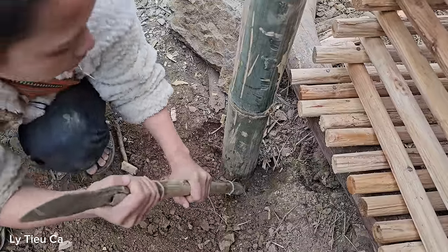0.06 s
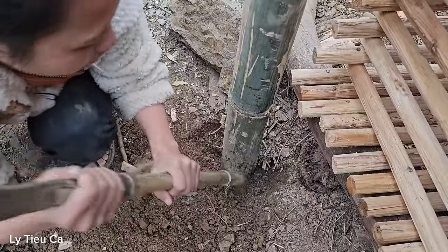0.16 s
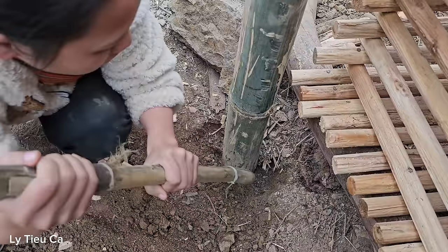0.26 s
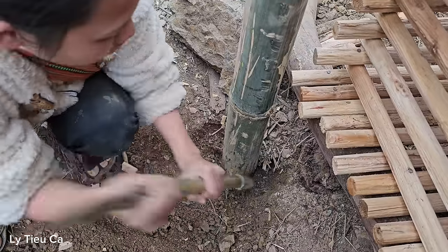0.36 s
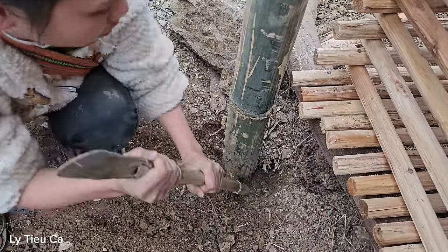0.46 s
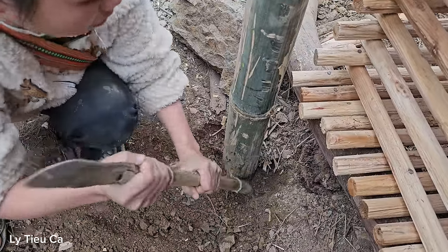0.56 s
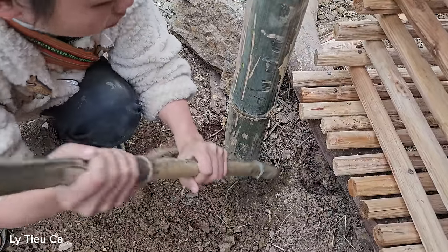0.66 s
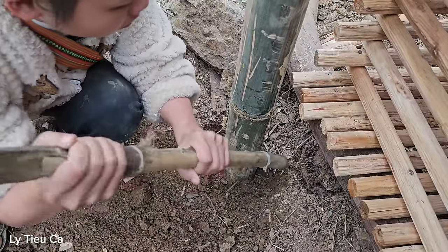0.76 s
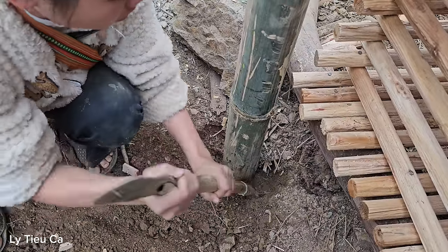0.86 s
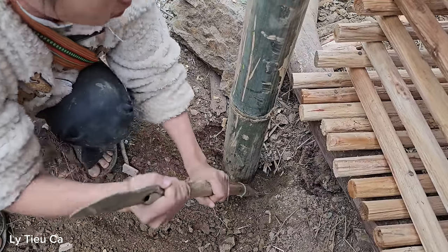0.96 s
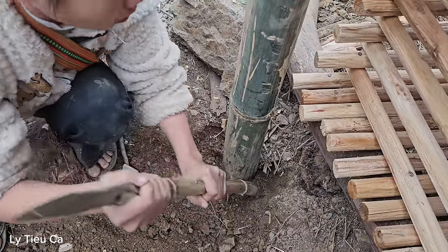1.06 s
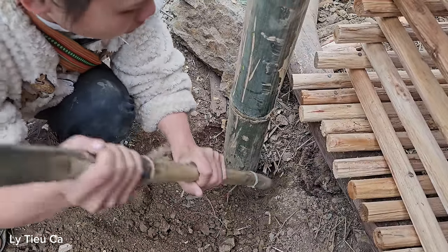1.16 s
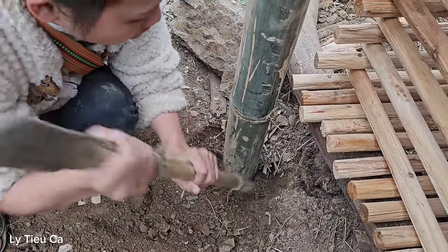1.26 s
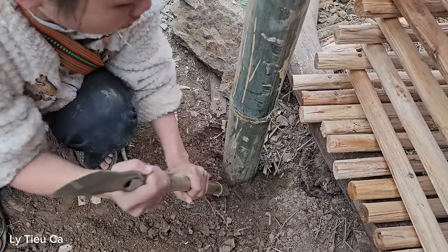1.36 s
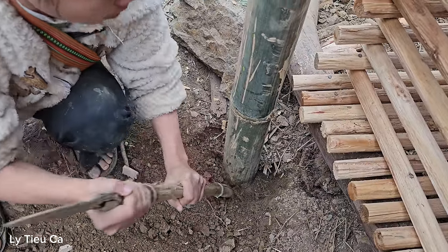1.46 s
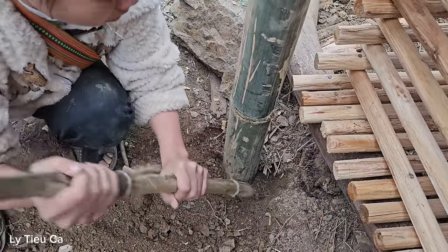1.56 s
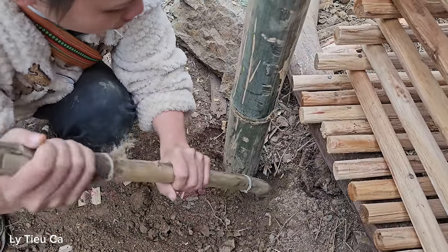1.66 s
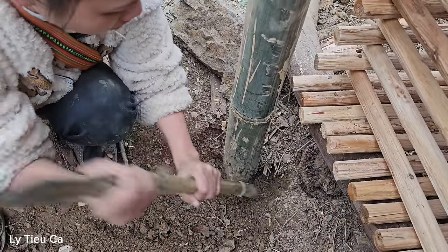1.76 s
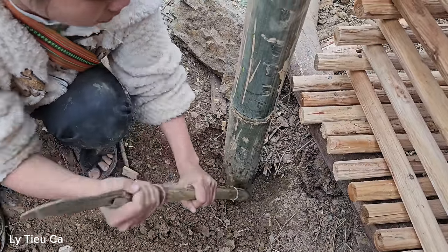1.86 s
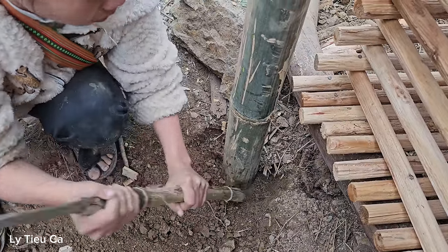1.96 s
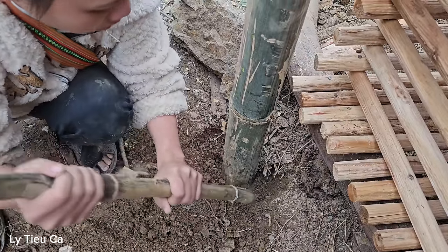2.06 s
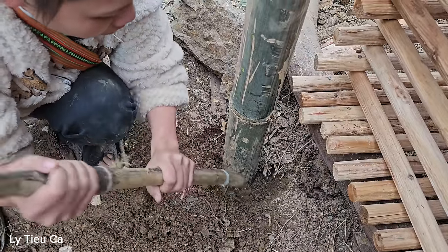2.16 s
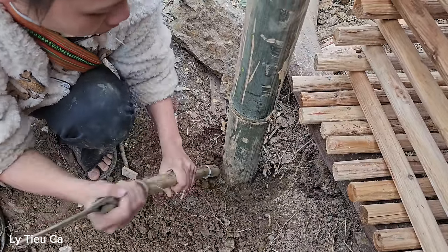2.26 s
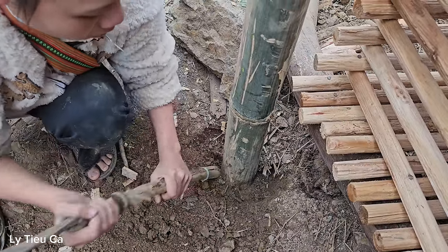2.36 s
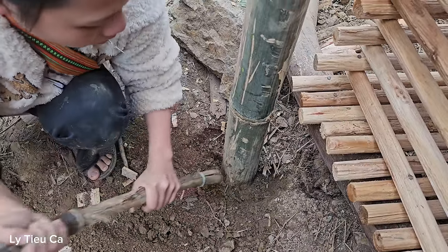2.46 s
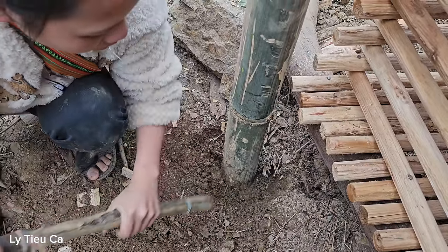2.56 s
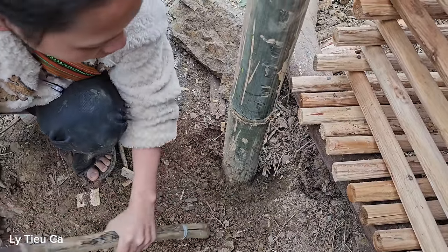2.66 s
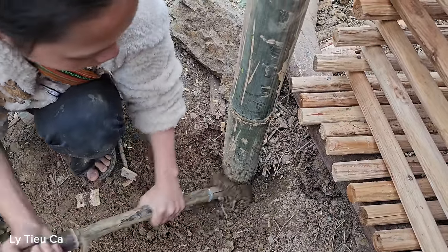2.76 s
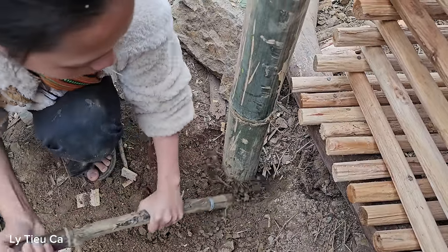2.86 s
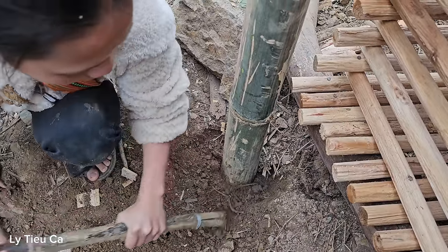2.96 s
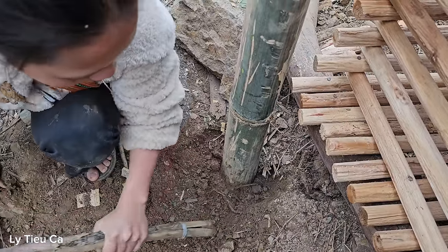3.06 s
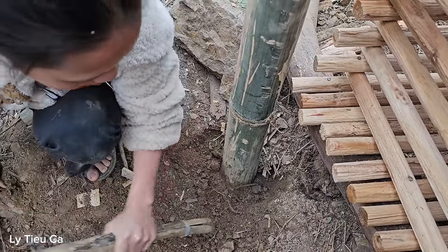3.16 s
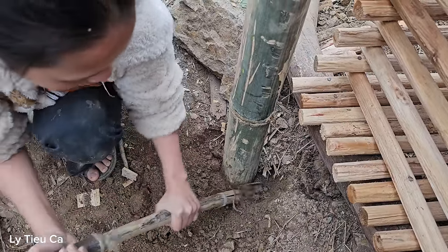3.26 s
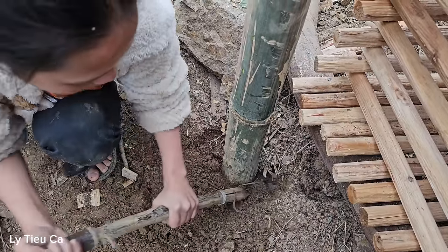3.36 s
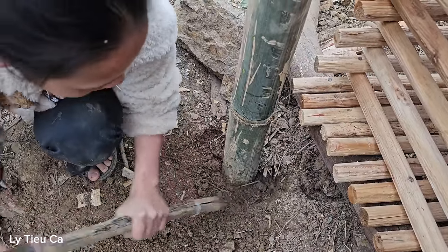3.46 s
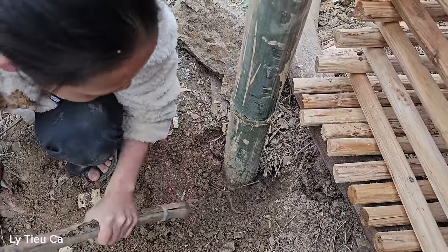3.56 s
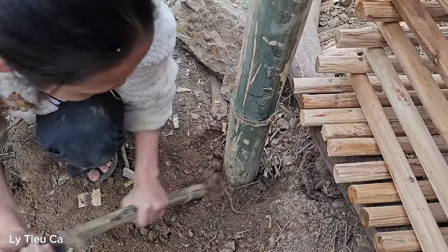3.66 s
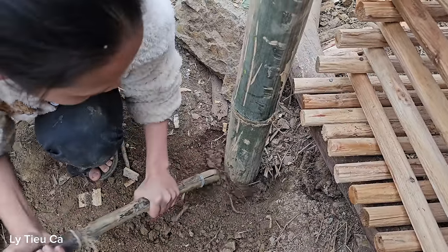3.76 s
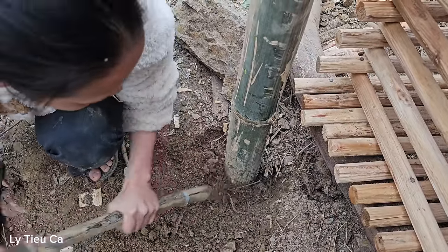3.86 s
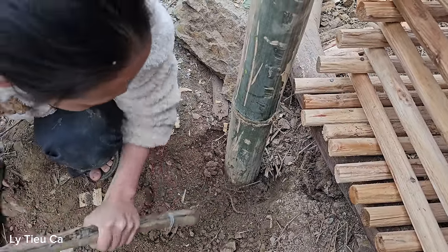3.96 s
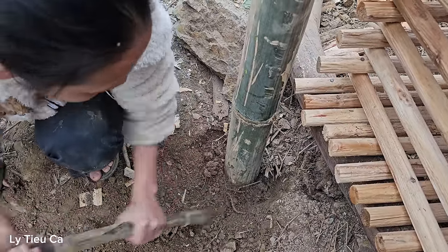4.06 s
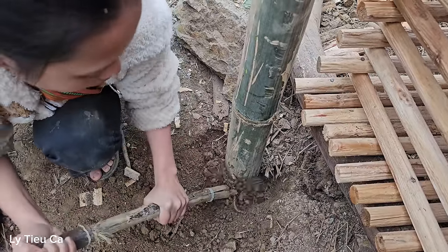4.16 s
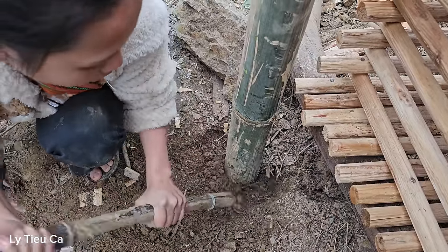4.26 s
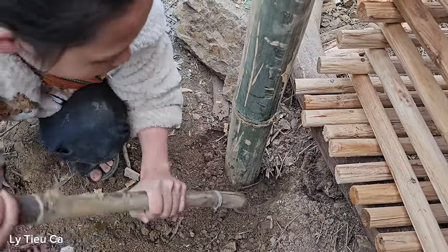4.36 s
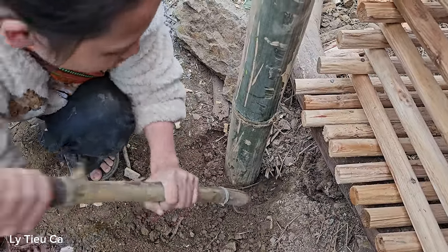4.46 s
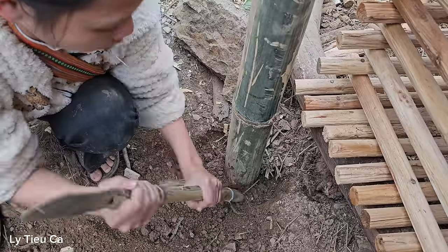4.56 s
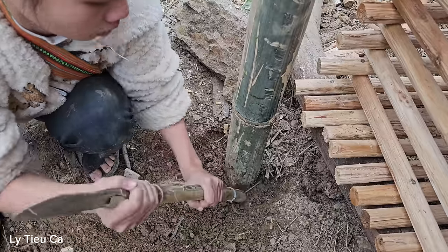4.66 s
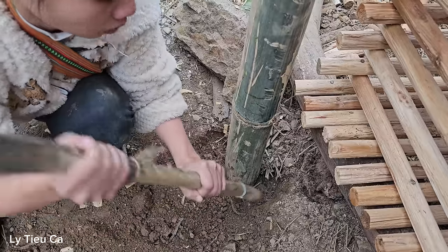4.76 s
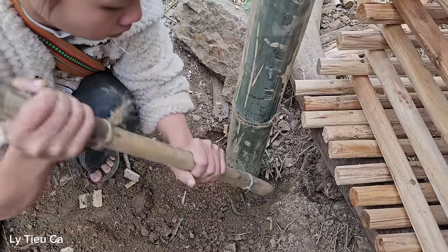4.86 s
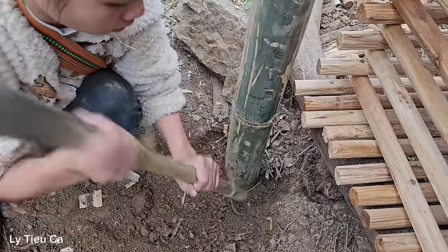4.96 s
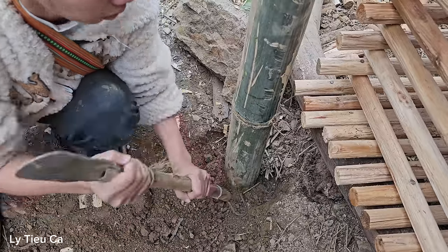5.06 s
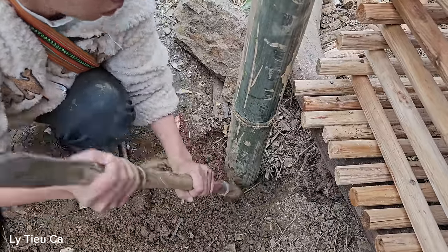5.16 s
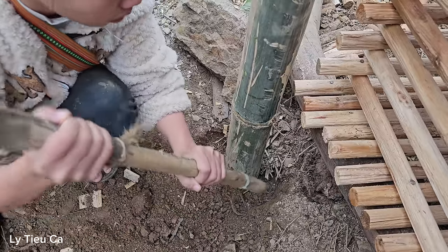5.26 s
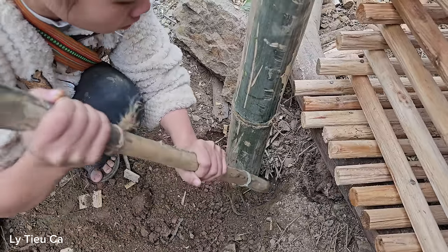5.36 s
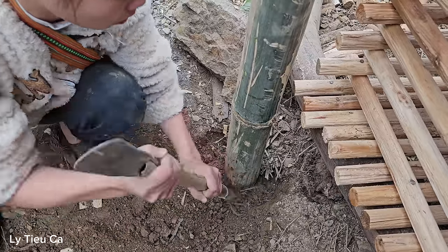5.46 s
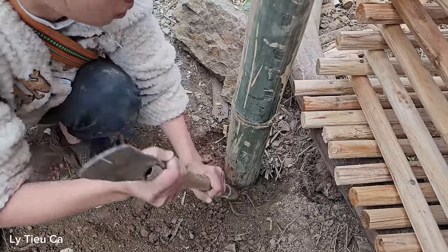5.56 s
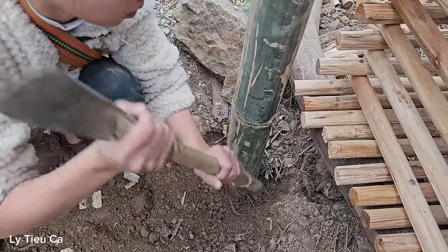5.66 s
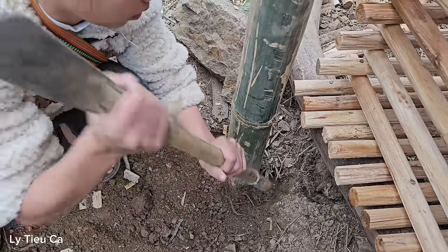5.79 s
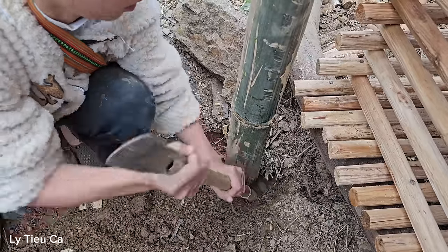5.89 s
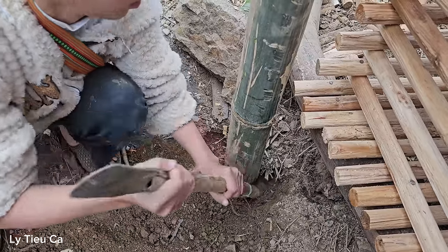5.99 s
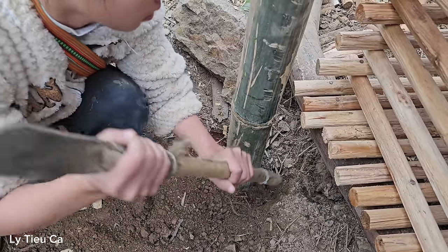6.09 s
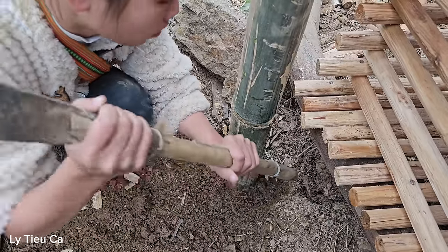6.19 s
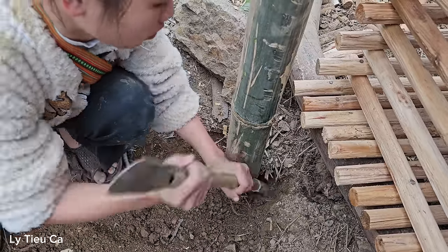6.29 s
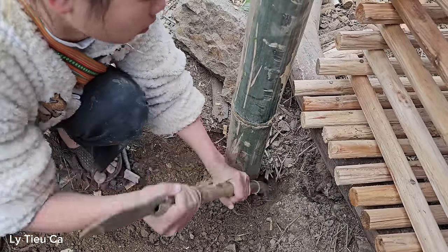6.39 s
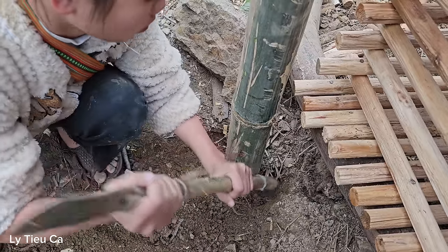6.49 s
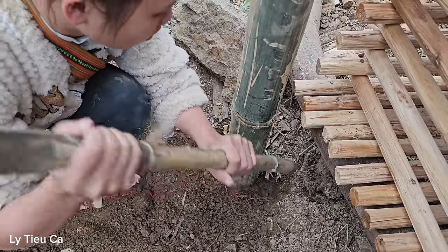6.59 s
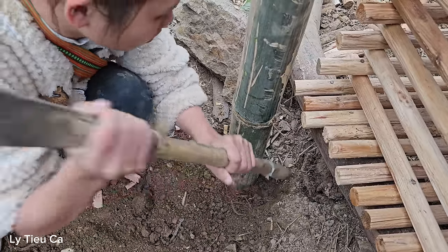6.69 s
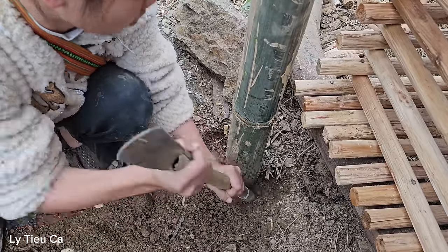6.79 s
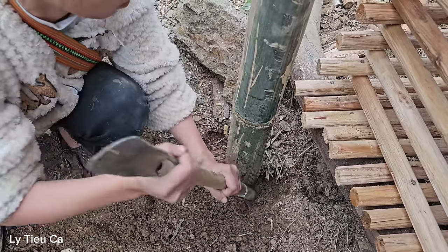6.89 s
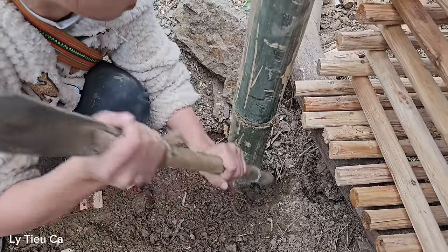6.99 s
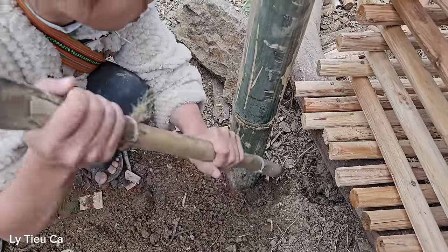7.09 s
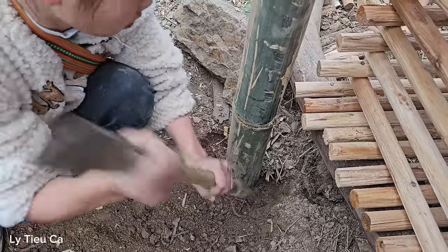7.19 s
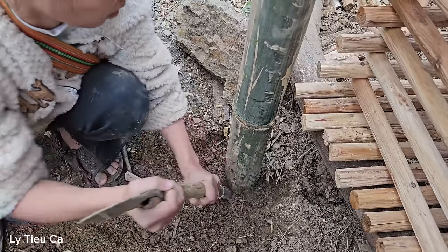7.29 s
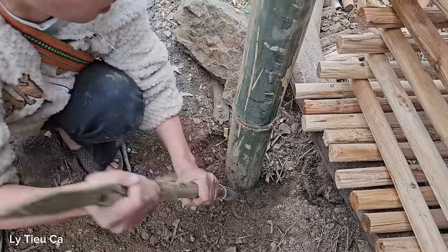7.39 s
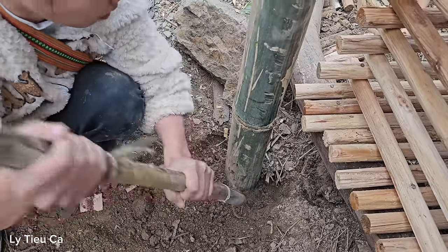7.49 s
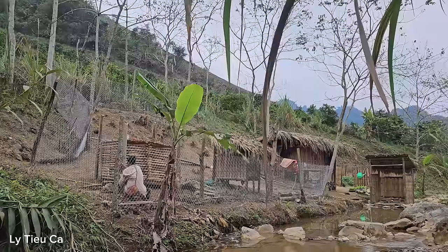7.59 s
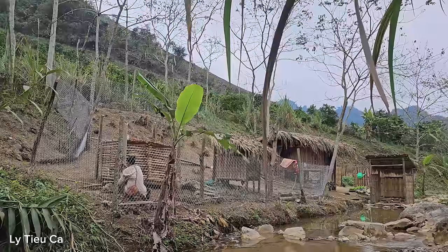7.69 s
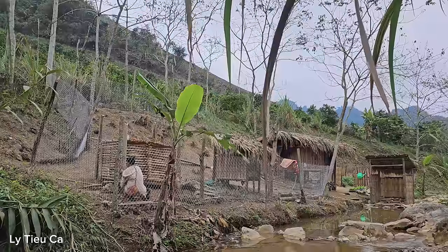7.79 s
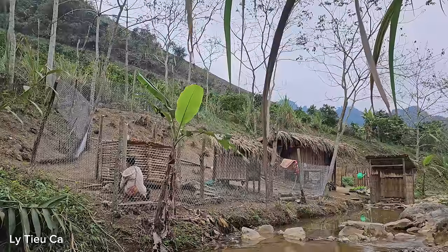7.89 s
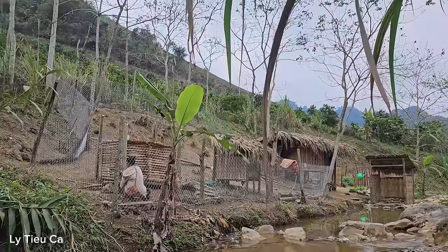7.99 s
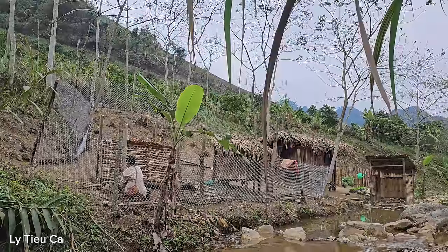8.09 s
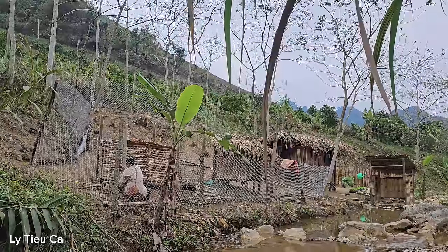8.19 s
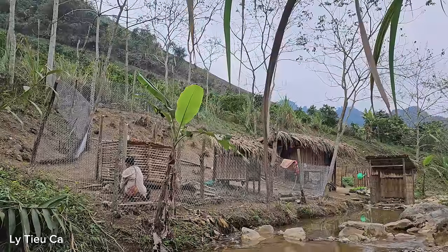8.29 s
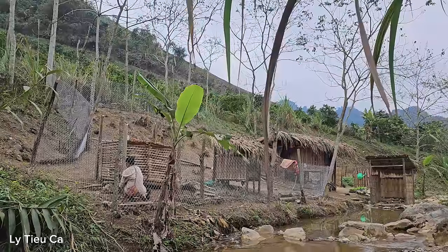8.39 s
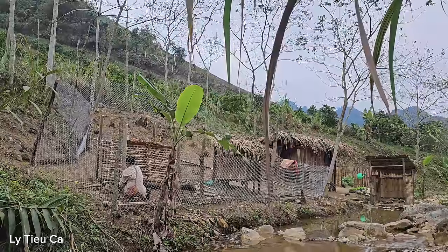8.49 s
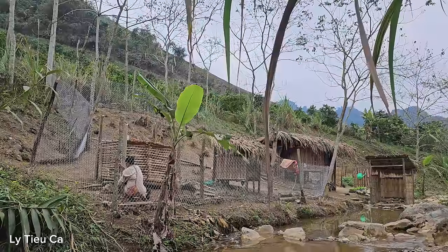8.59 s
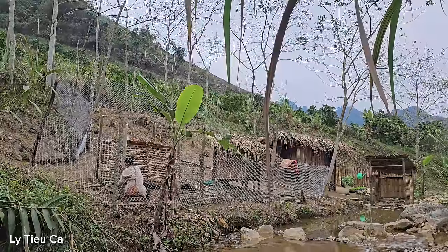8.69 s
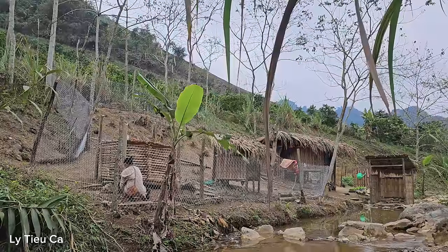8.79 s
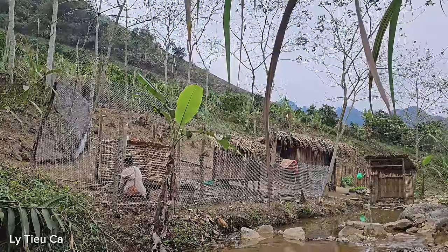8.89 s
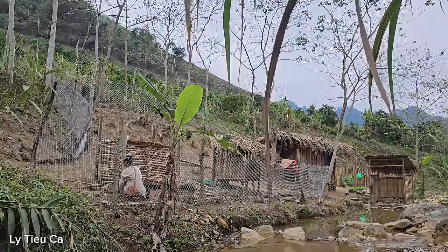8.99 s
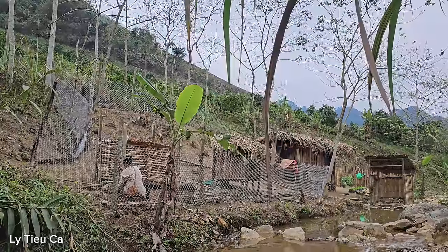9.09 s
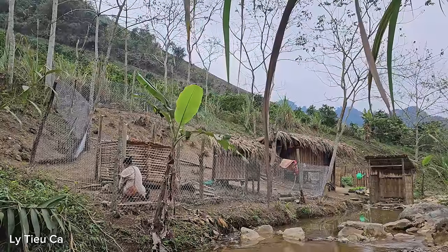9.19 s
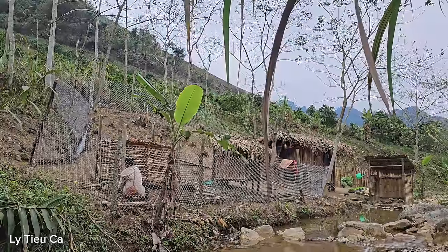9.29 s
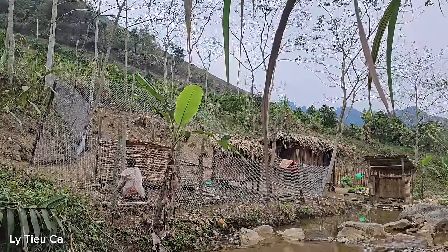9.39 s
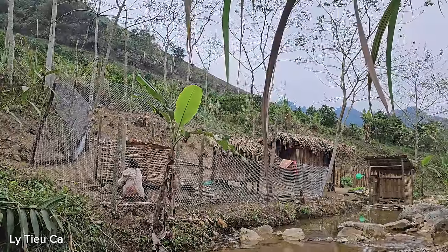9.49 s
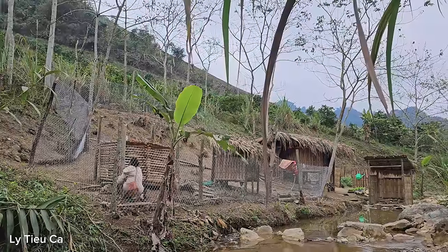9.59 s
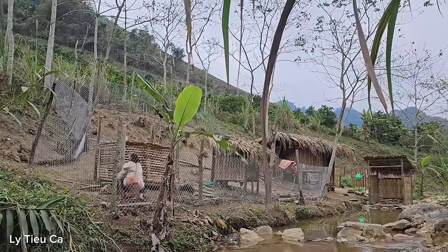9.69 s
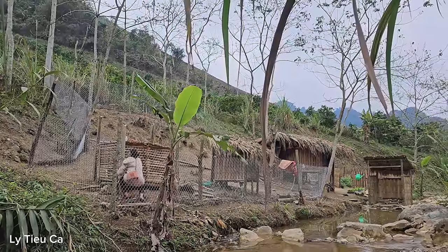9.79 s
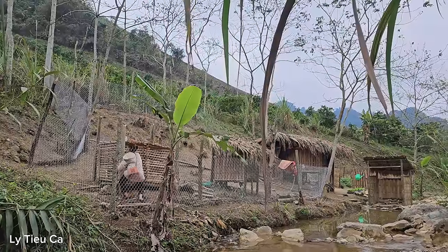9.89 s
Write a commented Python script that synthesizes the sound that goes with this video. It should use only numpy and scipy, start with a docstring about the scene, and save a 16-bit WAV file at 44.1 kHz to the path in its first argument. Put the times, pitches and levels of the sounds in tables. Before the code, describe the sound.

On a quiet farm, with chicks peeping and a faint engine hum, the end of a wooden handle pounds earth near the microphone. The steady knocks and crunching thuds ease into gentle pushes of soil, then come back hard, now and then catching a stone. Near the end the sound cuts to a spot by a small trickling stream, where the tamping and peeps carry faintly from a distance.

```python
"""A quiet farm, a two-port microphone close to a bamboo post; chicks peep, an engine drones far off.
From the start a wooden tool handle tamps soil round the post, about twice a second: each stroke
crunches grit, knocks in the handle as it meets packed earth, and thuds in the ground.
Midway the strokes soften and push loose soil in; then the hard knocks return, some catching a stone.
For the last two seconds the work and the chicks are heard from a distance, beside a small stream."""
import sys
import numpy as np
from scipy import signal
from scipy.fft import rfft, irfft
from scipy.io import wavfile
from scipy.ndimage import uniform_filter1d, minimum_filter1d

SR = 44100
rng = np.random.default_rng(int(sys.argv[2]) if len(sys.argv) > 2 else 0)


def transcribe(signal):
    """Save signal, clipped to [-1, 1], as a 16-bit WAV file at the path in sys.argv[1]."""
    frames = np.atleast_2d(signal).T
    limited = np.clip(frames, -1, 1)
    pcm = np.round(limited * 32767).astype(np.int16)
    wavfile.write(sys.argv[1], SR, pcm)


N = 438349
MOVE_S = 7.55  # the microphone moves to the stream

# each landing of the tip: start_s, knock_db, hardness_hz, thud_db, grit_db
STROKES = [(0.3514, 3, 2020, -15.5, -35), (0.8274, -1, 2400, -16.5, -26.5), (1.279, -31.5, 2490, -18, -32),
           (1.761, 0.5, 3080, -16.5, -33), (2.181, -12.5, 810, -30.5, -32), (2.219, -39.5, 2500, -22, -34),
           (2.746, -23, 940, -29, -37.5), (3.2457, -24.5, 3500, -45, -34.5),
           (3.6701, -47, 6000, -38.5, -34.5), (4.040, -42.5, 900, -27, -41),
           (4.5256, -13, 9000, -23.5, -25), (4.9686, -23.5, 1820, -20, -30.5),
           (5.4216, -29, 1385, -16.5, -33), (5.8264, 1.5, 5270, -21.5, -28), (6.274, -7, 5230, -25, -31.5),
           (6.738, 0.5, 4000, -17, -25), (7.1963, -11, 2480, -15, -28.5), (7.2014, -17, 756, -29, -28.5),
           (7.819, -41, 900, -41.5, -60), (8.292, -46, 756, -39.5, -52), (8.768, -46.5, 990, -34.5, -47.5),
           (9.191, -47, 686, -36.5, -54)]
# spectrum of crumbling soil: frequency_hz, level_db
SOIL_SPECTRUM = [(200, -8.5), (600, -5), (1000, -2.5), (1600, -9), (2300, -7), (4600, -3), (5800, -15.5),
                 (7500, -10), (9500, -20.5), (11500, -10), (13000, -20), (16000, -23)]
# how the two microphone ports hear:
# frequency_hz, diffuse_correlation, left_over_right_db, knock_right_lag_rad, knock_extra_left_db
PORTS = [(100, 0.96, 1.5, -3, 8.5), (300, 0.93, 0, 0.5, 0), (695, 0.37, 0, -1.47, -1.5),
         (1050, 0.1, -1.5, 1.92, -12), (1193, -0.85, -8.5, 0.6, 1), (1700, 0.43, -1.5, 4, 24.5),
         (2300, 0.48, 1.5, 5.5, -5.5), (3330, -0.37, 2, 5, -12), (4080, 0, -6.5, -1, -23),
         (12050, -0.023, -0.5, -9, -0.5)]


def handle(strength_db=27, flex_hz=380, flex_db_per_octave=11, neutral_hz=3400, grip=.008, grip_db=3):
    """The tip stops on packed earth: hard contact reaches higher modes, soft contact flexes the handle."""
    # the handle's ringing modes: pitch_hz, width_hz, level_db
    modes = [(227.6, 31, 12.5), (276.7, 23.3, 15.5), (505.8, 26.4, 15), (588, 33, 5.5), (714, 47, 11.5),
             (900, 56, 2), (1340, 98, 4.5), (2100, 300, 8.5), (2657, 220, 2), (3360, 280, 10)]
    # the dull knock under them: frequency_hz, level_db
    knock_spectrum = [(60, -37), (180, -34.5), (320, -20.5), (390, -20), (470, -11), (650, -7.5),
                      (850, -2.5), (1020, -4), (1350, -6.5), (1550, -19), (2300, -20.5), (4600, -20),
                      (5400, -40), (12000, -53.5)]
    out, hz = np.zeros((2, N)), np.fft.rfftfreq(16384, 1 / SR)
    mode_hz, width, mode_db = np.transpose(modes)[:, :, None]
    rise = 14  # samples
    onset = np.sin(np.pi / 2 * np.minimum(np.arange(len(hz)) / rise, 1)) ** 2
    lean = amp(curve(PORTS, hz, column=4) / 2)
    ports = np.array([lean, np.exp(-1j * curve(PORTS, hz, column=3)) / lean])
    for s, knock_db, hard_hz, _, _ in STROKES:
        # the grip shifts each mode a little in pitch and level
        detune, swell = rng.standard_normal((2, len(modes), 1))
        offset = 2 * (hz - mode_hz * (1 + grip * detune)) / width
        peaks = (offset ** 2 + amp(mode_db + grip_db * swell) ** 2) / (offset ** 2 + 1)
        ring_db = 10 * np.log10(peaks).sum(0)
        flex_db = flex_db_per_octave * np.log2(neutral_hz / hard_hz)
        contact_db = flex_db / (1 + (hz / flex_hz) ** 4) - 10 * np.log10(1 + (hz / hard_hz) ** 4)
        spectrum = ports * minimum_phase(curve(knock_spectrum, hz) + ring_db + contact_db)
        knock = np.roll(irfft(spectrum), rise, axis=1)[:, :len(hz)]
        add(out, s - rise / SR, -amp(strength_db + knock_db) * knock * onset)
    return out


def ground(push_s=.003, build_s=.01, level_db=1, lag_s=.01148, lag_halving_db=32.5, drift=.02):
    """The soil yields, then takes the weight as one soft push; the thud comes sooner after a weak knock."""
    # modes of the ground with the post in it: pitch_hz, level_db, t60_s
    modes = [(38.2, -18.5, 0.43), (73.9, 2.5, 0.087), (90, -11.5, 0.0278), (106.8, -8, 0.21),
             (193.5, -2.5, 0.044)]
    out, t = np.zeros((2, N)), np.arange(SR // 2) / SR
    hz, db, t60 = np.transpose(modes)[:, :, None]
    push = np.sin(np.pi * np.minimum(t / push_s, 1)) ** 2
    build = 1 - np.exp(-t / build_s) / 2
    for s, knock_db, _, thud_db, _ in STROKES:
        detune = 1 + drift * rng.standard_normal(hz.shape)
        ring = (amp(db - 60 * t / t60) * np.cos(2 * np.pi * hz * detune * t)).sum(0)
        thud = signal.fftconvolve(ring * build, push / push.sum())[:len(t)]
        add(out, s + lag_s * 2 ** (knock_db / lag_halving_db), amp(level_db + thud_db) * thud)
    return highpass(out, 22)


def grit(grains_per_s=9000, spread_db=3, crush_s=.0086, doubling_db=74.5, trickle_db=-25, trickle_s=.071):
    """Soil grains snap under the tip as it lands or scrapes; a few crumbs roll on afterwards."""
    # the tip pushes loose soil towards the post: start_s, level_db, length_s
    scrapes = [(2.726, -32, 0.024), (2.772, -30, 0.013), (3.228, -36, 0.043), (3.604, -41, 0.033),
               (3.659, -37.5, 0.033), (4.088, -44, 0.035), (6.262, -30.5, .01), (8.88, -53, .025),
               (9.08, -50.5, .054)]
    power, t = np.zeros((1, N)), np.arange(SR // 3) / SR
    crunches = list(scrapes)
    for s, knock_db, _, _, grit_db in STROKES:
        length = crush_s * 2 ** (-knock_db / doubling_db)  # a weak knock sinks in for longer
        crunches.append((s - .26 * length, grit_db, length))  # just ahead of the knock
        crunches.append((s + .0054, knock_db - 31, .01))  # the weight settles
    trickle = amp(trickle_db) * np.exp(-t / trickle_s)
    for s, db, length in crunches:
        crush = (1 - np.exp(-t / (.36 * length))) * np.exp(-(t / length) ** 2)
        add(power, s, (amp(db) * (crush + trickle)) ** 2)
    sizes = amp(spread_db * np.minimum(rng.exponential(1, (2, N)), 4)) * rng.choice([-1, 1], (2, N))
    grains = unit_rms(sizes * (rng.random((2, N)) < grains_per_s / SR))
    return diffuse(grains * np.sqrt(power), lambda hz: curve(SOIL_SPECTRUM, hz))


def stones(drift=.017):
    """A small stone stops the tip at once, so its higher modes ring."""
    # the tip catches a stone: start_s, level_db
    hits = [(2.772, -24), (3.6724, -27.5), (4.5254, -22), (4.5285, -23), (5.827, -17.5), (6.274, -18),
            (6.739, -23)]
    # the clack of wood on stone: pitch_hz, level_db, t60_s
    modes = [(936, -8.5, 0.039), (2376, -2.5, 0.012), (3180, -0.5, 0.013), (4350, 3.5, 0.006)]
    out, t = np.zeros((2, N)), np.arange(SR // 10) / SR
    hz, db, t60 = np.transpose(modes)[:, :, None]
    port_lag = curve(PORTS, hz, column=3) * np.array([0, 1])[:, None, None]
    for s, level_db in hits:
        detune = 1 + drift * rng.standard_normal(hz.shape)
        ring = np.sin(2 * np.pi * hz * detune * t - port_lag)
        add(out, s, (amp(level_db + db - 60 * t / t60) * ring).sum(1))
    return out


def crumbs(per_s=18, level_db=-57, spread_db=2, decay_s=.0074):
    """Crumbs and dry leaves tick under hands and feet, heard only close to the post."""
    t = np.arange(SR // 20) / SR
    sizes = amp(level_db + spread_db * np.minimum(rng.exponential(1, N), 3))
    ticks = sizes * (rng.random(N) < per_s / SR)
    level = signal.fftconvolve(ticks, np.exp(-t / decay_s))[:N] * (np.arange(N) / SR < MOVE_S)
    return diffuse(rng.standard_normal((2, N)) * level, lambda hz: curve(SOIL_SPECTRUM, hz))


def shuffles(centre_hz=240, db_per_octave=12):
    """Feet and clothes rub, soft and low, as the crouching worker shifts."""
    # each rub: start_s, level_db, length_s
    rubs = [(0.505, -45.5, 0.082), (3.195, -44, 0.032), (3.62, -45, 0.014), (5.341, -48, .035),
            (5.945, -48, 0.074)]
    level = np.zeros((1, N))
    for s, db, length in rubs:
        add(level, s, amp(db) * signal.windows.hann(round(length * SR)))
    return diffuse(rng.standard_normal((2, N)) * level, band(centre_hz, db_per_octave))


def peep(s, top_hz, slide, held_db, fall_db, mid_hz=3470, end_hz=2480, sag_hz_per_s=3000, knee_hz=110):
    """A thin note is held, sags, then slides through the throat's two resonances; gives start and sound."""
    above_usual_hz = top_hz - 4425  # higher calls are held longer and are brighter
    hold_s = max(.06 + .00007 * above_usual_hz, 0)
    overtone_db = fall_db - 25 + .0132 * above_usual_hz
    lead_s = hold_s + (top_hz - sag_hz_per_s * hold_s - mid_hz) / slide
    t = np.arange(-lead_s, (mid_hz - end_hz) / slide, 1 / SR)
    wobble, *flutter = unit_rms(uniform_filter1d(rng.standard_normal((3, SR)), 300))[:, :len(t)]
    sagging, sliding = top_hz - sag_hz_per_s * (t + lead_s), mid_hz - slide * t
    hz = -knee_hz * np.logaddexp(-sagging / knee_hz, -sliding / knee_hz)  # the lower of the two, rounded
    hz *= 1 + .0092 * wobble
    phase = 2 * np.pi * np.cumsum(hz) / SR + rng.uniform(-.24, 1, (2, 1))
    held = amp(held_db) * hump(hz, top_hz, width_hz=1100)
    throat = amp(fall_db) * hump(hz, centre_hz=3380, width_hz=640)
    overtone = amp(overtone_db) * hump(2 * hz, centre_hz=6500, width_hz=1280)
    voice = (held + throat) * np.sin(phase) + overtone * np.sin(2 * phase)
    return s - lead_s, amp(5.5 * np.array(flutter)) * voice * signal.windows.tukey(len(t), .15)


def chicks(faint_count=12, faint_db=-63, low_hz=4200, high_hz=5100, slide_hz_per_s=22000):
    """Clear peeps stand out over the faint calls of the rest of the brood."""
    # the clearest peeps: mid_fall_s, top_hz, slide_hz_per_s, held_db, fall_db
    clear_peeps = [(.385, 5050, 21700, -58, -57), (0.482, 4320, 19000, -79, -46.5),
                   (0.676, 4720, 27300, -63, -46), (0.899, 5250, 31850, -55, -39.5),
                   (1.05, 4560, 22000, -58.5, -73), (1.19, 5200, 38000, -60, -61),
                   (1.477, 4400, 31700, -67, -48), (1.622, 4275, 38000, -57.5, -49),
                   (2.075, 4550, 36000, -59, -43), (2.676, 4610, 37700, -64, -45),
                   (2.96, 4390, 22000, -51.5, -55), (3.17, 4220, 16000, -55.5, -65),
                   (3.425, 4390, 18200, -64, -54.5), (3.665, 4485, 30100, -60, -42),
                   (3.783, 4580, 25600, -62, -53), (4.163, 4850, 26000, -59, -47),
                   (4.646, 5380, 32000, -57, -41), (4.95, 4420, 20000, -58, -73),
                   (5.111, 4500, 33800, -63, -53), (5.185, 5290, 24700, -54, -49.5),
                   (5.661, 4310, 16100, -59, -58), (5.901, 4500, 21860, -62, -53),
                   (6.113, 5170, 27700, -56.5, -46.5), (6.612, 4790, 20000, -57, -55.5),
                   (6.982, 5180, 32000, -59, -39.5), (7.459, 4940, 18230, -77, -49),
                   (7.701, 4500, 26300, -64, -50.5), (8.6, 4910, 22000, -59, -60),
                   (8.885, 5090, 24200, -56.5, -60), (9.01, 4350, 15000, -57.5, -68),
                   (9.25, 4380, 9000, -59, -79), (9.683, 4400, 16000, -66, -68),
                   (9.875, 4460, 23900, -60, -62)]
    out = np.zeros((2, N))
    for row in clear_peeps:
        add(out, *peep(*row))
    for k, (when, pitch, pace, soft) in enumerate(rng.random((faint_count, 4))):
        s = (k + when) / faint_count * N / SR
        top_hz = low_hz + (high_hz - low_hz) * pitch ** 2
        db = faint_db + 1 - 2 * soft
        add(out, *peep(s, top_hz, slide_hz_per_s * (.5 + pace), db, db))
    return out


def bubbles(faint_count=55, faint_db=-60, low_hz=480, high_hz=1150, decay_cycles=16, glide=.052):
    """Bubbles in the stream ring briefly and rise in pitch: a few loud ones among many faint."""
    # the loudest bubbles: start_s, pitch_hz, level_db
    loudest = [(8.262, 934, -47), (8.545, 775, -44.5), (8.592, 763, -49.5), (9.16, 689, -49)]
    out, t = np.zeros((2, N)), np.arange(SR // 8) / SR
    faint = [(MOVE_S + when * (N / SR - MOVE_S),
              low_hz * (high_hz / low_hz) ** pitch,
              faint_db + 6 * np.log(loud + .04)) for when, pitch, loud in rng.random((faint_count, 3))]
    for s, hz, db in list(loudest) + faint:
        age = t * hz / decay_cycles
        port_phase = np.array([[0], [rng.random()]])
        ring = np.sin(2 * np.pi * hz * t * (1 + glide * age / 2) + port_phase)
        add(out, s, amp(db) * ring * (1 - np.exp(-10 * age)) * np.exp(-age))
    return out


def engine(waver_db=1, rumble_db=-9):
    """Only low multiples of a far engine's firing rate carry; each wavers on the way, over a rumble."""
    # the engine speeds up and eases off: time_s, firing_hz, level_db
    running = [(0.0, 22.5, -70), (1.0, 22.4, -67.5), (1.54, 16.7, -58), (3.32, 23.1, -58),
               (4.72, 24.2, -56.5), (5.22, 21.7, -60), (5.75, 24.0, -65), (7.5, 20.7, -63)]
    # its drone: firing_multiple, level_db
    harmonics = [(3, -1), (4, 0), (5, 1.5), (6, -6)]
    s, firing_hz, db = np.transpose(running)
    t, knots = np.arange(N) / SR, np.arange(0, N / SR + 1, .1)
    firings = np.cumsum(np.interp(t, s, firing_hz)) / SR
    drone = np.zeros(N)
    for k, line_db in harmonics:
        waver = waver_db * np.interp(t, knots, rng.standard_normal(len(knots)))
        drone += amp(line_db + waver) * np.sin(2 * np.pi * (round(k) * firings + rng.random()))
    rumble = diffuse(rng.standard_normal((2, N)), band(centre_hz=100, db_per_octave=14))
    return amp(np.interp(t, s, db)) * (unit_rms(drone) + amp(rumble_db) * rumble)


def air(by_stream, level_db, flicker_db):
    """The outdoor wash at either microphone position flickers in patches, less so in the treble."""
    # open air near the post: frequency_hz, level_db
    yard = [(15, -61.5), (25, -9), (102, -6), (153, -14), (185, -11.5), (416, -7.5), (545, -14),
            (818, -16.5), (1070, -13), (2110, -12.5), (2480, -18), (3080, -12.5), (4740, -21.5),
            (5570, -16.5), (16000, -34)]
    # open air by the stream: frequency_hz, level_db
    stream = [(15, -52), (25, -33), (39, -13), (131, -19.5), (187, -9), (246, -15.5), (274, -21.5),
              (541, -12.5), (1160, -19), (2290, -21), (3080, -21.5), (4050, -18), (4640, -24.5),
              (14900, -38), (16600, -51)]
    # narrow humps in the wash: centre_hz, width_hz, near_post_db, by_stream_db
    humps = [(105, 22, 4, 2.5), (194.7, 56, 10, 6.5), (820, 135, 8, 0.5), (2115, 230, 2, 4),
             (4626, 500, 9.5, -2), (11700, 280, 3, -3)]
    hz, _, cells = signal.stft(rng.standard_normal((2, N)), SR, nperseg=1024, noverlap=768)
    patches = uniform_filter1d(rng.standard_normal(cells.shape[1:]), 8, axis=0)
    patches = unit_rms(uniform_filter1d(patches, 9, axis=1))
    cells *= amp(flicker_db * patches / (1 + hz[:, None] / 5000))
    noise = signal.istft(cells, SR, nperseg=1024, noverlap=768)[1][:, :N]

    def colour_db(f):
        humps_db = sum((far_db if by_stream else near_db) * hump(f, centre, width)
                       for centre, width, near_db, far_db in humps)
        return curve(stream if by_stream else yard, f) + humps_db
    return amp(level_db) * diffuse(unit_rms(noise), colour_db)


def echoes(x, t60_s, wet_db):
    """Faint scattered echoes come back from the post, the slats and the slope."""
    t = np.arange(SR // 2) / SR
    taps = rng.standard_normal((2, len(t))) * (rng.random((2, len(t))) < .06)
    taps *= (t > .002) * amp(-60 * t / t60_s)
    taps /= np.linalg.norm(taps, axis=1, keepdims=True)
    return amp(wet_db) * signal.fftconvolve(x, taps, axes=1)[:, :N]


def diffuse(x, colour_db):
    """Colours two unrelated signals at equal power; the ports hear the long waves alike."""
    hz = np.fft.rfftfreq(N, 1 / SR)
    a, b = rfft(x) * unit_rms(amp(colour_db(hz)))
    correlation = np.clip(curve(PORTS, hz), -.99, .99)
    mid, side = a * np.sqrt((1 + correlation) / 2), b * np.sqrt((1 - correlation) / 2)
    return irfft(np.array([mid + side, mid - side]), N)


def minimum_phase(gain_db):
    """The spectrum with this colour that answers a blow at once and then dies away."""
    log_gain = np.log(amp(gain_db))
    phase = -signal.hilbert(np.r_[log_gain, log_gain[-2:0:-1]]).imag[:len(log_gain)]
    return np.exp(log_gain + 1j * phase)


def curve(table, hz, column=1):
    """One column of a table, joined on a log-frequency axis."""
    columns = np.transpose(table)
    return np.interp(np.log(hz + 1), np.log(columns[0] + 1), columns[column])


def band(centre_hz, db_per_octave):
    return lambda hz: -db_per_octave * abs(np.log2((hz + 1) / centre_hz))


def hump(hz, centre_hz, width_hz):
    return np.exp(-((hz - centre_hz) / width_hz) ** 2)


def highpass(x, hz):
    return signal.sosfilt(signal.butter(2, hz, "high", fs=SR, output="sos"), x)


def amp(db):
    return 10 ** (np.asarray(db) / 20)


def unit_rms(x):
    return x / np.sqrt(np.mean(x ** 2) + 1e-20)


def add(mix, s, sound):
    part = mix[:, max(round(s * SR), 0):][:, :sound.shape[-1]]
    part += sound[..., :part.shape[-1]]


def scene():
    """The work and the chicks, first from beside the post, then from the stream."""
    knocks, peeps = handle() + stones(), chicks()
    far = np.clip((np.arange(N) / SR - MOVE_S) / .016, 0, 1)
    near_air = air(by_stream=False, level_db=-52.5, flicker_db=4)
    far_air = air(by_stream=True, level_db=-53, flicker_db=3.5)
    # only the short waves bounce off the post and the slats
    bounce = echoes(highpass(knocks, 1200), t60_s=.035, wet_db=-8.5)
    tail = echoes(knocks, t60_s=.2, wet_db=-28)
    # from far off the direct peeps weaken while their echoes stay
    birds = amp(-4 - 1.4 * far) * peeps + echoes(peeps, t60_s=.14, wet_db=-9.5)
    work = knocks + bounce + tail + ground() + grit() + crumbs() + shuffles()
    return work + birds + bubbles() + np.sqrt(1 - far) * (near_air + engine()) + np.sqrt(far) * far_air


def record(dry, ceiling=.97, top_hz=16150):
    """The two microphone ports differ in colour; a fast limiter holds the peaks; the top treble is cut."""
    tilt_db = curve(PORTS, np.fft.rfftfreq(N, 1 / SR), column=2)
    heard = irfft(rfft(dry) * amp(np.array([tilt_db, -tilt_db]) / 2), N)
    allowed = ceiling / np.maximum(abs(heard).max(0), ceiling)
    limited = heard * uniform_filter1d(minimum_filter1d(allowed, size=41), size=41)
    lowpass = signal.firwin(511, top_hz, window=("kaiser", 9), fs=SR)
    return signal.oaconvolve(limited, lowpass[None], "same")


dry = scene()
out = record(dry)
transcribe(out)
```